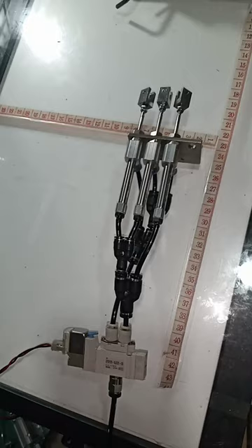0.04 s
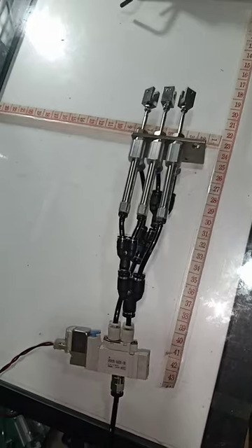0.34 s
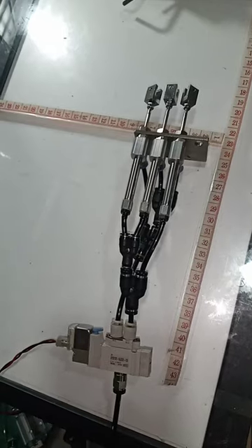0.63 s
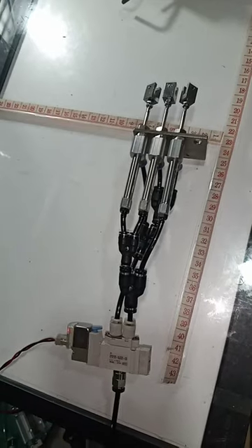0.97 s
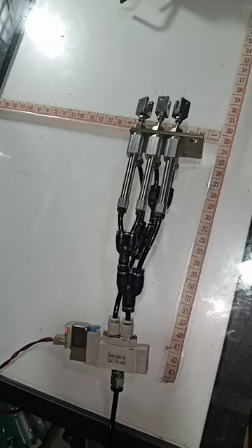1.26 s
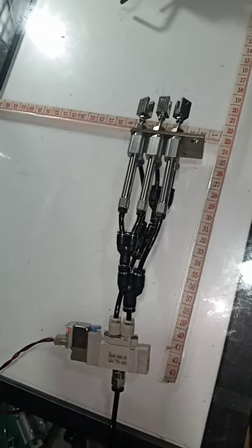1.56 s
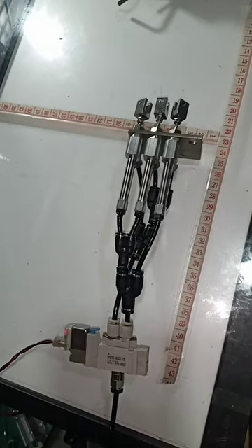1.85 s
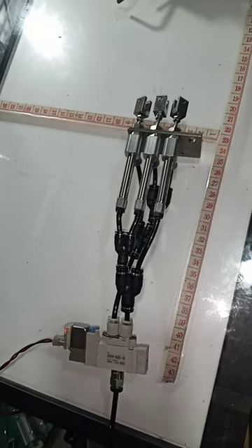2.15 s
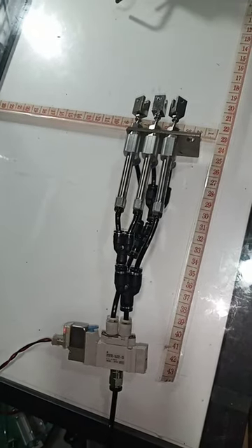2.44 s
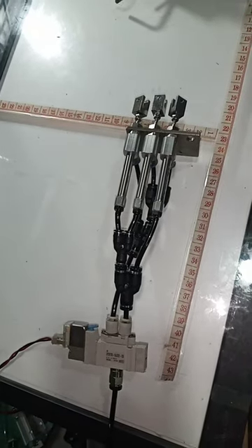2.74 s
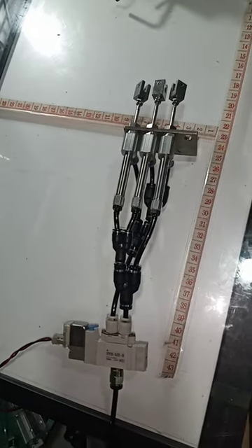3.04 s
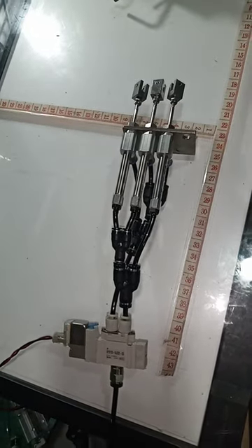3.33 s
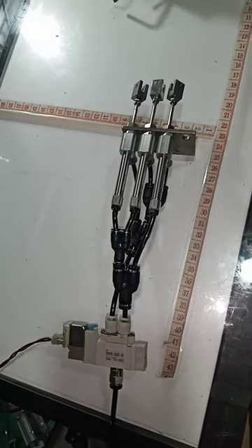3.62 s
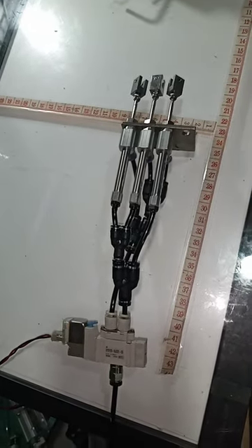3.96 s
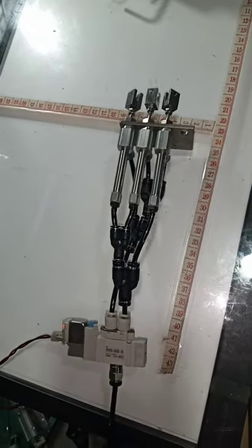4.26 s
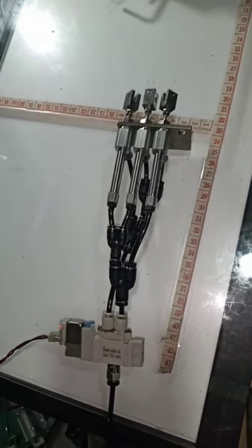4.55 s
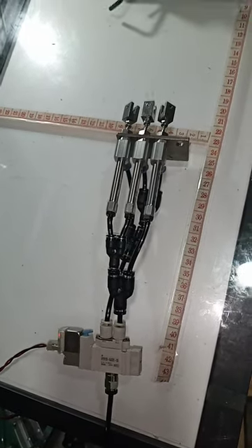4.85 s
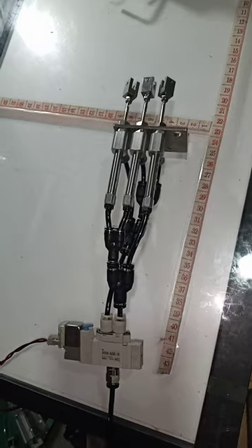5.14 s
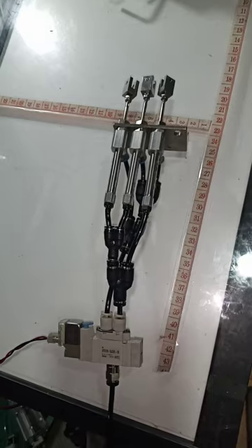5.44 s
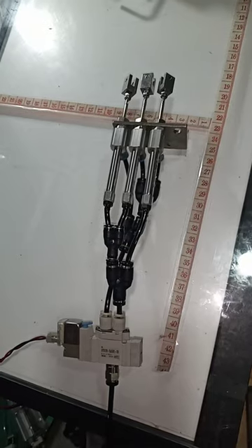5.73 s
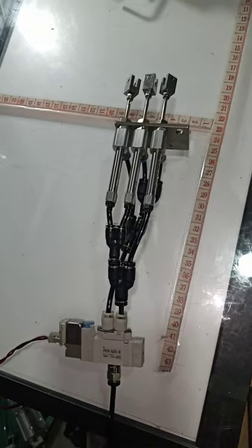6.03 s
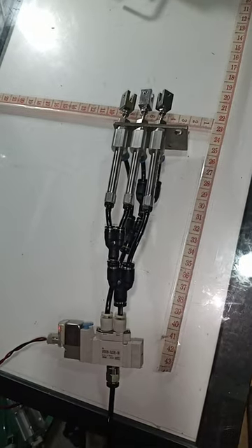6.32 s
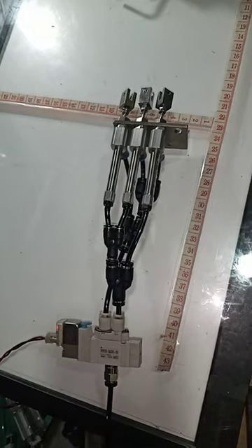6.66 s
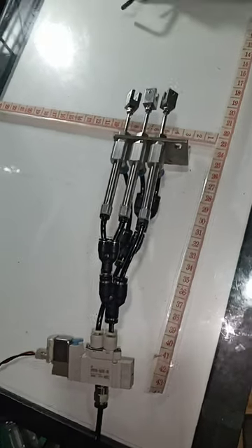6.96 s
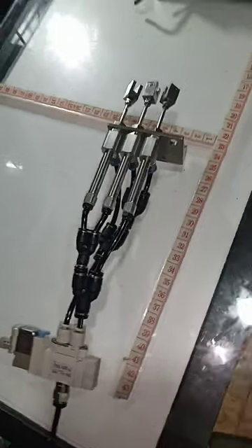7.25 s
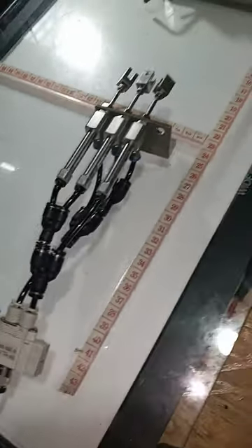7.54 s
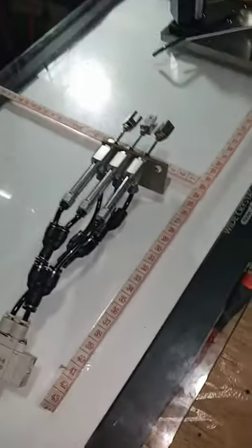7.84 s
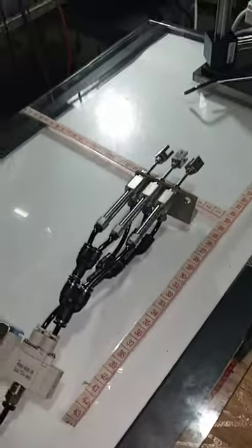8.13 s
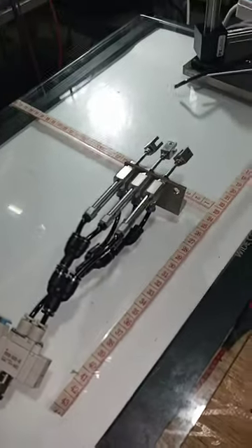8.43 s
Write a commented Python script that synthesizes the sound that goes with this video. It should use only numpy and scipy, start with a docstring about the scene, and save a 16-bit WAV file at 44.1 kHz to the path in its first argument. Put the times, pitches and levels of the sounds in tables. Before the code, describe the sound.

Small air cylinders clack sharply six times, each with a short hiss of released air, over a humming, hissing workshop with swishing machinery.

```python
"""Air cylinders on a workshop bench

A solenoid valve drives three small air cylinders through six strokes. At each, the valve clacks and
thumps the bench, the pistons knock on their stops, and spent air hisses from the exhaust port.
Behind them are a motor hum, a thin leak and machinery that swishes to and fro, whirrs and whistles.
A draught buffets the microphone, which turns away near the end."""
import sys
import numpy as np
from scipy import signal
from scipy.fft import rfft, irfft, next_fast_len
from scipy.io import wavfile
from scipy.ndimage import uniform_filter1d

SR = 44100
rng = np.random.default_rng(int(sys.argv[2]) if len(sys.argv) > 2 else 0)


def file_out(sig):
    """Save sig as 16-bit WAV at sys.argv[1]."""
    # one column per channel
    cols = np.atleast_2d(sig).T
    # limit, then scale
    lim = np.clip(cols, -1, 1)
    pcm = np.round(lim * 32767).astype(np.int16)
    wavfile.write(sys.argv[1], SR, pcm)


N = 383229
TIME = np.arange(N) / SR

# valve strokes: (time [s], clack level [dB], clack length [s], exhaust level [dB], exhaust hold [s],
# clack left-right [dB], thud level [dB], chirp level [dB])
STROKES = [(0.789, 4, 0.0024, -29.5, 0.085, 3.5, -8.5, -45), (2.53, -1, 0.0044, -30.5, .13, 3, -7.5, -35),
           (4.001, -3, 0.0024, -31.5, 0.11, 12, -22, -45),
           (4.795, -3, 0.0054, -29.5, .13, 10.5, -13.5, -10.5),
           (6.036, -5.5, 0.0024, -31, 0.12, 7, -20, -51), (6.555, -4.5, 0.0037, -29.5, .13, 9, -11, -4.5)]
# spells of whirring, each with a rush of air: (time [s], length [s], whirr level [dB], rush level [dB])
WHIRRS = [(0.58, 0.183, -48, -39.5), (2.023, .14, -48, -42), (2.59, .17, -49, -40),
          (3.297, .24, -47, -41.5), (3.79, .18, -58, -40), (4.716, 0.45, -48.5, -46),
          (5.851, 0.15, -43.5, -44.5), (6.103, .22, -48.5, -45), (7.054, 0.37, -42.5, -45),
          (7.456, 0.24, -51.5, -41.5), (8.463, 0.26, -45, -43)]


def amp(db):
    """Amplitude ratio of a level in decibels."""
    return 10 ** (np.asarray(db) / 20)


def unit_rms(x):
    """Normalisation to unit mean power."""
    return x / np.sqrt(np.mean(x ** 2) + 1e-20)


def follow(rows, t=TIME):
    """Linear interpolation of each column of a curve at the times t."""
    times, *columns = np.transpose(rows)
    return [np.interp(t, times, column) for column in columns]


def pan(balance_db):
    """Level difference, left minus right, as two gains; the louder side has gain 1."""
    balance = np.atleast_1d(balance_db)
    return amp(np.array([np.minimum(balance, 0), np.minimum(-balance, 0)]))


def colour(rows, hz):
    """Magnitude response of both channels, rolling off below the first frequency."""
    freqs, *levels = np.transpose(rows)
    gain = amp([np.interp(np.log(hz + 1), np.log(freqs), db) for db in levels])
    return gain / np.sqrt(1 + (0.84 * freqs[0] / (hz + 1)) ** 6)


def resonances(rows, hz):
    """Magnitude response of steep-sided resonances whose powers add."""
    return np.sqrt(sum((pan(balance) * amp(db) / (1 + ((hz - centre) / width * 2) ** 2)) ** 2
                       for centre, width, db, balance in rows))


def add(mix, start, sound):
    """Superposition of a stereo sound on the mix from a start time in seconds."""
    part = mix[:, max(round(start * SR), 0):][:, :sound.shape[1]]
    part += sound[:, :part.shape[1]]


def spell(start, length, rise, fall, t=TIME):
    """Envelope with a linear attack, a hold and an exponential decay."""
    age = t - start
    return np.clip(age / rise, 0, 1) * np.exp(-np.clip((age - length) / fall, 0, 20))


def drift(knots):
    """Slow random modulation: straight lines between Gaussian values."""
    return np.interp(TIME, np.linspace(0, N / SR, knots), rng.standard_normal(knots))


def white(count, correlation):
    """White noise, partly correlated between the channels."""
    left, other = rng.standard_normal((2, count))
    return np.array([left, correlation * left + np.sqrt(1 - correlation ** 2) * other])


def turbulence(response, rows, correlation, patchy_db):
    """Spectrally shaped noise whose level fluctuates in patches of time and frequency."""
    hz, _, spectra = signal.stft(white(N, correlation), SR, nperseg=2048, noverlap=1536)
    patches = uniform_filter1d(rng.standard_normal(spectra.shape[1:]), size=14, axis=0)
    patches = unit_rms(uniform_filter1d(patches, size=6, axis=1))
    spectra = spectra * response(rows, hz)[:, :, None] * amp(patchy_db * patches)
    return unit_rms(signal.istft(spectra, SR, nperseg=2048, noverlap=1536)[1][:, :N])


def through_body(force, rows):
    """Forced response of a body: a minimum-phase filter of given spectrum and unit mean energy."""
    hz = abs(np.fft.fftfreq(4096, 1 / SR))
    log_gain = np.log(colour(rows, hz) + 1e-4)
    response = np.fft.ifft(np.exp(np.conj(signal.hilbert(log_gain)))).real[:, :2048]
    return signal.oaconvolve(force, response / np.sqrt((response ** 2).sum() / 2), axes=1)[:, :N]


def free_vibration(modes):
    """Impulse response of a struck body: a sum of damped sinusoids."""
    t = np.arange(SR // 6) / SR
    return sum(amp(db - 60 * t / t60) * np.sin(2 * np.pi * hz * t) for hz, db, t60 in modes)


def workshop(floor_db=-44, waver_rad=0.52):
    """Ambient noise: a broadband wash, low room resonances and the phase-modulated hum of motors."""
    # spectrum of the wash: (frequency [Hz], left level [dB], right level [dB])
    wash = [(25, -30, -59), (82, -9, -21), (200, -24, -22), (450, -30, -32), (1340, -19.5, -29.5),
            (2040, -10.5, -38), (3000, -13.5, -32), (3940, -32.5, -31), (6000, -28.5, -37.5),
            (8640, -30, -61), (11460, -64, -37.5), (13000, -51, -64), (14800, -47, -42), (15800, -43, -60)]
    # low resonances: (frequency [Hz], width [Hz], level [dB], left-right [dB])
    rumble = [(86, 12, 3.5, 24), (134, 15, -5, 18), (178.7, 13, -2.5, 18)]
    drone = [(327, 125, 0.5, 9)]
    upper_drone = [(727, 176, -2.5, 9), (930, 150, -8.5, 15)]
    # their levels as the microphone moves: (time [s], rumble [dB], drone [dB], upper drone [dB])
    levels = [(.4, -52, -54, -58), (2.8, -49, -56, -61.5), (4.2, -52.5, -62, -59.5), (6.8, -49, -67, -57),
              (7.2, -42.5, -59, -61), (7.6, -45, -56.5, -53), (8.69, -47.5, -58, -52)]
    # motor tones: (frequency [Hz], level [dB], left-right [dB])
    hum = [(49.7, -44.5, 14), (86.5, -55, 14)]
    rumble_db, drone_db, upper_db = follow(levels)
    out = amp(floor_db) * turbulence(colour, wash, 0.023, 2.6)
    out += amp(rumble_db) * turbulence(resonances, rumble, 0.12, 1.4)
    out += amp(drone_db) * turbulence(resonances, drone, 0.019, 3)
    out += amp(upper_db) * turbulence(resonances, upper_drone, 0.092, 3)
    for hz, db, balance in hum:
        phase = 2 * np.pi * hz * TIME + waver_rad * drift(knots=40)
        out += np.sqrt(2) * amp(db) * pan(balance) * np.sin(phase)
    return out


def leak():
    """Directivity: air escaping at a fitting hisses in narrow resonances, each beamed its own way."""
    # main beam, side lobe and finer jet: (frequency [Hz], width [Hz], level [dB], left-right [dB])
    main = [(4732, 150, -1.5, 9), (5048, 303, 5, 12), (5467, 120, 1.5, 30), (6397, 147, 0, 43),
            (7045, 116, -3, 62), (7660, 140, -5.5, 22), (8220, 103, -2, 21), (9410, 190, -15, 11),
            (10400, 400, -31, -16), (11080, 240, -25, -11)]
    lobe = [(5420, 280, -5, 10), (6730, 170, -10, 20)]
    jet = [(8166, 240, 0.5, 26), (8550, 250, -7.5, 20), (10330, 250, -15.5, -12)]
    # the microphone leaves the beam, crosses the lobe and meets the jet: (time [s], level [dB])
    main_level = [(.4, -45), (4, -45), (6.7, -44.5), (7.1, -53), (7.85, -55.5), (8.69, -57.5)]
    lobe_level = [(6.6, -57), (6.95, -48.5), (7.15, -54), (7.65, -53.5), (7.85, -69)]
    jet_level = [(.4, -86), (6.6, -72), (7.1, -56), (8, -55), (8.69, -55.5)]
    beams = [(main_level, main), (lobe_level, lobe), (jet_level, jet)]
    return sum(amp(follow(level)[0]) * turbulence(resonances, rows, 0.57, 0.73) for level, rows in beams)


def swish_powers(rise_s=0.072, fall_s=0.04, swell_db=5.5, swell_s=0.24):
    """Incoherent addition: pushes and weaker returns sum as powers in three parts of the swish."""
    # machine cycles: (time [s], push length [s], push level [dB], return level [dB])
    cycles = [(0.375, .19, -37, -60), (0.808, 0.27, -32.5, -41), (1.483, 0.29, -32.5, -41.5),
              (2.205, 0.28, -32.5, -39.5), (2.896, 0.28, -33, -41), (3.6, 0.27, -33, -40),
              (4.318, 0.31, -33, -48.5), (4.858, 0.23, -38, -73), (5.42, 0.25, -39, -65),
              (6.10, 0.21, -41.5, -63), (6.65, 0.26, -38, -48.5), (7.4, 0.25, -40, -50)]
    upper, low, late = np.zeros((3, N))
    for start, length, push_db, return_db in cycles:
        push = amp(push_db) * spell(start, length, rise_s, fall_s)
        back = amp(return_db) * spell(start + length, 0.36, rise_s, fall_s)
        swell = amp(swell_db * (np.clip((TIME - start) / swell_s, 0, 1) - 1))
        upper += (push * swell) ** 2 + back ** 2
        # the low band does not swell, and its return stops earlier
        low += (amp(push_db - 1.5) * spell(start, length, 0.043, fall_s)) ** 2
        low += (amp(return_db + 1) * spell(start + length, 0.26, rise_s, fall_s)) ** 2
        late += (push * swell ** 2) ** 2
    return upper, low, late


def swish(upper_power, low_power, late_power, gain_db=2, idle_db=-62, ring_db=-9, split_hz=1600):
    """Amplitude-modulated noise in two bands, with a resonance that comes up late in each push."""
    # spectrum of the swish: (frequency [Hz], left level [dB], right level [dB])
    spectrum = [(890, -77, -47), (1198, -5, -10.5), (1200, -5.5, -12), (1970, -1.5, -16.5),
                (2380, -5, -14.5), (2980, -1, -7), (3446, -16.5, -14), (4060, -63, -50), (6000, -35, -60),
                (15700, -82, -62)]
    # late resonance: (frequency [Hz], width [Hz], level [dB], left-right [dB])
    ring = [(2883, 220, 0, 30)]
    # leftward shift as the microphone turns: (time [s], relative left-right [dB])
    side = [(.4, 12.5), (4.6, 13.5), (5.4, 15.5), (6.3, 16), (7.1, 19.5), (8.69, 20)]
    rush_power = sum((amp(db) * spell(start, length, rise=0.021, fall=0.019)) ** 2
                     for start, length, _, db in WHIRRS)
    noise = turbulence(colour, spectrum, 0.52, 1.95)
    low = signal.sosfiltfilt(signal.butter(4, split_hz, fs=SR, output="sos"), noise)
    out = np.sqrt(upper_power + rush_power + amp(idle_db) ** 2) * (noise - low)
    out += np.sqrt(low_power) * low
    out += amp(ring_db) * np.sqrt(late_power) * turbulence(resonances, ring, 0.7, 1.5)
    return amp(gain_db) * pan(follow(side)[0] - 10) * out


def whirr(swish_power, gain_db=1, idle_db=-53.5, coupling_db=-15):
    """Narrow-band noise that idles, rises in spells and is stirred a little by every swish."""
    # machine resonances: (frequency [Hz], width [Hz], level [dB], left-right [dB])
    bands = [(3370, 176, -1, 5.5), (3585, 55, 1, 10), (3684, 66, 1, 7), (3807, 180, -4.5, 16)]
    power = swish_power * amp(coupling_db) ** 2 + amp(idle_db) ** 2
    for start, length, db, _ in WHIRRS:
        power += (amp(db) * spell(start, length, rise=0.021, fall=0.019)) ** 2
    return amp(gain_db) * np.sqrt(power) * turbulence(resonances, bands, 0.1, 2.3)


def valve(decay_s=0.0025, slam_s=0.0005, tail_s=0.025, tail_db=-25, full_strike_s=0.0036, chatter=0.61):
    """Impact excitation: the spool slams over and chatters briefly as the air breaks through."""
    # response of the valve body: (frequency [Hz], left level [dB], right level [dB])
    body = [(171, 3, -11.5), (740, -1, 8), (1700, 0.5, 3), (2740, 3, -8.5), (3480, -3, -6), (5270, -2, -17),
            (6900, -1.5, -4), (7850, -12, -6.5), (7800, 6, -70), (8960, -0.5, 0), (11100, 1.5, 7.5),
            (12300, -7.5, -9), (15300, -1, 6), (17200, -45, -26)]
    force, t = np.zeros((2, N)), np.arange(3500) / SR
    for start, db, length, _, _, balance, *_ in STROKES:
        slam = 1 + 2.05 * np.exp(-t / slam_s)
        tail = amp(tail_db) * np.exp(-t / tail_s)
        envelope = slam * np.exp(-np.maximum(t - length, 0) / decay_s) + tail
        grains = unit_rms(white(len(t), 1.0) * np.exp(chatter * rng.standard_normal(len(t))))
        grains[:, 0] += 3.1 * min(length / full_strike_s, 1)  # first contact, lighter in a short clack
        add(force, start, amp(db) * pan(balance) * envelope * grains)
    return through_body(force, body)


def thuds(balance_db=7):
    """Reaction force: the recoil of the valve body excites the low modes of the bench top."""
    # bench modes: (frequency [Hz], level [dB], t60 [s])
    modes = [(110, -3, 0.14), (205, -28, .05), (260.4, -9.5, 0.098), (309, 15, 0.046), (842, 12, 0.059)]
    out, thud = np.zeros((2, N)), free_vibration(modes)
    for start, *_, db, _ in STROKES:
        add(out, start, amp(db) * pan(balance_db) * thud / abs(thud).max())
    return out


def exhaust(rise_s=0.004, bright_decay_s=0.058, dull_decay_s=0.074, split_hz=4200, flutter=0.041):
    """Jet noise: the flow holds while the chambers are full, then dies away, treble first."""
    # spectrum of the jet: (frequency [Hz], left level [dB], right level [dB])
    spectrum = [(90, -6, -9), (194, -4, -11), (710, -11, -17), (2200, 1.5, -15), (3470, -8.5, -17),
                (4400, -13, -15.5), (5800, -11, -19.5), (7400, -3, -18), (8340, -6.5, -41),
                (9400, -12, -14.5), (11100, -22, -8.5), (13900, -28, -22), (15000, -6, -10),
                (15700, -29, -27)]
    jet = turbulence(colour, spectrum, 0.24, 2.7)
    low = signal.sosfiltfilt(signal.butter(2, split_hz, fs=SR, output="sos"), jet)
    out, t = np.zeros((2, N)), np.arange(SR * 3 // 5) / SR
    for start, _, _, db, hold, *_ in STROKES:
        now = round(start * SR) + np.arange(len(t))
        emptying = np.maximum(t - hold, 0)
        ripple = unit_rms(uniform_filter1d(rng.standard_normal(len(t)), size=300))
        flow = amp(db) * (1 - np.exp(-t / rise_s)) * (1 + flutter * ripple)
        bright = (jet[:, now] - low[:, now]) * np.exp(-(emptying / bright_decay_s) ** 1.14)
        dull = low[:, now] * np.exp(-emptying / dull_decay_s)
        add(out, start, flow * (bright + dull))
    return out


def chirps(end_hz=130, sweep_hz=3300, fall_s=0.001808, delay_s=0.002745):
    """Frequency sweep: as the port opens, a short chirp drops from a whistle to a low push."""
    out, t = np.zeros((2, N)), np.arange(400) / SR
    phase = 2 * np.pi * np.cumsum(end_hz + sweep_hz * np.exp(-(t / fall_s) ** 2)) / SR
    chirp = np.sin(phase) * signal.windows.tukey(len(t), 0.15) * np.exp(-t / 0.012)
    for start, *_, db in STROKES:
        add(out, start + delay_s, amp(db) * pan(29) * chirp)
    return out


def pistons(tick_db=3, bracket_db=1.5, balance_db=8, contact_s=0.00021):
    """Impact and modal ringing: each rod ticks on its stop and excites the bracket and clevises."""
    # pistons and plunger landing: (time [s], level [dB], decay time [s], relative tick level [dB])
    knocks = [(0.8185, -7, 0.0041, -7.5), (2.5243, -26, 0.0013, 9), (2.5448, -6, 0.0044, -0.5),
              (2.5544, -7, 0.0056, -8), (4.0298, -11, 0.0044, -8.5), (4.7893, -27, 0.0011, 4),
              (4.8098, -12.5, 0.0038, 3), (4.8170, -14, .003, -3), (4.8210, -9, 0.0028, -10),
              (6.0640, -13, 0.005, -7.5), (6.0790, -34, .004, -6), (6.5495, -30, 0.0011, 6),
              (6.5693, -16, 0.0024, 8.5), (6.5760, -12.5, 0.006, -3.5), (6.5808, -12, 0.0023, -16)]
    # response of the stops: (frequency [Hz], left level [dB], right level [dB])
    stops = [(173, -35, -47), (756, -2, -25), (1100, -30, -7), (1490, 3, -47), (2010, -9.5, -42),
             (2070, 3.5, -30), (3000, 0.5, -15), (5400, -9.5, -4), (6840, -1.5, -4), (8600, -8, -14),
             (11000, -15, -8), (13500, -29, -15), (15200, -1, -11), (15800, -29, -25)]
    # modes of bracket and clevises: (frequency [Hz], level [dB], t60 [s])
    modes = [(734, -14.5, 0.06), (1600, -30, 0.037), (1780, -4, 0.013), (2076, 1.5, 0.036),
             (2373, 9, 0.012), (2536, -2, 0.043)]
    force, tick = np.zeros((2, 2, N))
    t = np.arange(2600) / SR
    for start, db, decay, hard_db in knocks:
        blow = amp(db) * (1 - np.exp(-t / contact_s)) * np.exp(-t / decay) * white(len(t), 0.15)
        add(force, start, blow)
        add(tick, start, amp(hard_db) * blow)
    bracket = free_vibration(modes)
    ringing = signal.oaconvolve(force, bracket[None] / np.linalg.norm(bracket), axes=1)[:, :N]
    return amp(tick_db) * through_body(tick, stops) + amp(bracket_db) * pan(balance_db) * ringing


def draught(low_hz=56, eddy_hz=112, eddy_db=-43, gust_db=5, puff_hz=137.4, hz_per_db=3.5):
    """Turbulent pressure on the microphone: many weak eddies and a few strong puffs make soft thuds."""
    # strong puffs: (time [s], peak level [dB], half length [s], left-right [dB])
    puffs = [(1.459, -22.5, 0.012, 1), (1.52, -22.5, 0.012, -8.5), (1.565, -27.5, 0.0075, 23),
             (1.863, -24, 0.052, 6.5), (2.07, -20.5, 0.0087, 34), (2.132, -11.5, 0.01, 38),
             (2.317, -20, 0.024, 37), (2.37, -28, 0.027, 4), (3.007, -19, 0.019, 28),
             (3.071, -10.5, 0.019, 32), (3.241, -7, 0.0028, 45), (3.438, -15, 0.016, 18),
             (3.472, -16.5, 0.015, 21), (3.747, -21.5, 0.0086, 36)]

    def low_band(x, edge_hz):
        band = [low_hz, max(edge_hz, low_hz + 20)]
        return signal.sosfilt(signal.butter(3, band, "band", fs=SR, output="sos"), x)

    gusts = amp(gust_db * drift(knots=130))
    eddies = unit_rms(gusts * low_band(white(N, 0.17), eddy_hz))
    out = amp(eddy_db) * pan(4) * spell(start=1.17, length=2.4, rise=0.054, fall=0.065) * eddies
    t = np.arange(-6000, 6000) / SR
    for centre, db, half_length, balance in puffs:
        burst = white(len(t), 0.22) * np.exp(-abs(t / half_length) ** 1.5)
        puff = low_band(burst, puff_hz + hz_per_db * (db + 20.5))  # stronger puffs reach higher
        add(out, centre + t[0] - 0.007, amp(db) * pan(balance) * puff / abs(puff).max(1, keepdims=True))
    return out


def whistles(width_hz=66, balance_db=10):
    """Random modulation of a tone: air sings briefly in a narrow, fuzzy line within the whirr's band."""
    # brief whistles: (time [s], length [s], pitch [Hz], level [dB])
    notes = [(2.007, .06, 3570, -42), (2.039, 0.14, 3710, -44.5), (3.15, 0.07, 3600, -48),
             (3.778, 0.075, 3540, -40), (3.875, 0.081, 3660, -45), (6.107, .08, 3555, -41),
             (6.222, .09, 3700, -42), (6.446, 0.051, 3660, -54), (7.439, .19, 3700, -48),
             (8.357, .1, 3740, -41.5)]
    out, t = np.zeros((2, N)), np.arange(SR // 2) / SR
    narrow = signal.butter(2, width_hz / 2, fs=SR, output="sos")
    for start, length, hz, db in notes:
        waver = signal.sosfilt(narrow, rng.standard_normal(len(t)) + 1j * rng.standard_normal(len(t)))
        tone = (waver / np.sqrt(abs(waver) + 1e-12) * np.exp(2j * np.pi * hz * t)).real
        envelope = spell(0, length, rise=0.021, fall=0.019, t=t)
        add(out, start, amp(db) * pan(balance_db) * envelope * unit_rms(tone))
    return out


def interference(x, patch_s=0.13, patch_hz=190):
    """Interference: the moving microphone passes through peaks and nulls of the room's reflections."""
    # depth of the random colouring: (time [s], depth [dB])
    depth = [(4.5, 1), (5.3, 2), (7, 2.4), (7.9, 3.3), (8.69, 2.8)]
    hz, t, spectra = signal.stft(x, SR, nperseg=1024, noverlap=768)
    field = rng.standard_normal(spectra.shape[1:])
    field = uniform_filter1d(field, size=round(patch_hz / hz[1]), axis=0)
    field = unit_rms(uniform_filter1d(field, size=round(patch_s / t[1]), axis=1))
    bass_taper = np.minimum(hz / (2 * patch_hz), 1)[:, None]
    gain = amp(follow(depth, t)[0] * field * bass_taper)
    gain /= np.sqrt((gain ** 2).mean(0))
    return signal.istft(spectra * gain, SR, nperseg=1024, noverlap=768)[1][:, :N]


def reverberation(x, gap_s=0.006):
    """Diffuse reverberation: a noise tail in which each band decays at its own rate."""
    # reverberation times: (frequency [Hz], t60 [s])
    decay_times = [(100, 0.23), (1000, 0.066), (4000, 0.42), (9000, 0.38), (16000, 0.17)]
    hz, t, spectra = signal.stft(rng.standard_normal((2, SR // 2)), SR, nperseg=256)
    t60 = np.interp(hz, *np.transpose(decay_times))
    tail = signal.istft(spectra * amp(-60 * t / t60[:, None]) * (t > gap_s), SR, nperseg=256)[1]
    return signal.fftconvolve(x, tail / np.linalg.norm(tail[0]), axes=1)[:, :N]


def standing_waves(x, dip_db=-2.0):
    """Standing waves between bench, rig and microphone lift narrow bands and thin those between."""
    # resonant peaks: (frequency [Hz], width [Hz], lift above the dip [dB])
    peaks = [(1373, 35, 5), (1562, 30, 5), (1851, 35, 4), (2102, 60, 3), (2490, 40, 3), (2850, 60, 4),
             (3544, 30, 3), (6694, 35, 3), (7224, 55, 3), (7384, 35, 3), (7840, 30, 4), (8442, 55, 3),
             (11218, 65, 4), (15187, 100, 3)]
    size = next_fast_len(N + 4096)
    hz = np.fft.rfftfreq(size, 1 / SR)
    lift = 1 + sum((amp(db) - 1) / (1 + 2j * (hz - centre) / width) for centre, width, db in peaks)
    dip = amp(dip_db * np.clip(hz / 1200, 0, 1))
    return irfft(rfft(x, size) * lift * dip, size)[:, :N]


def limiter(x, threshold_db=-14, detector_fall_db_per_s=140, strength=0.64):
    """Dynamic compression: both channels duck at each loud peak and swell back."""
    power_db = 10 * np.log10(abs(uniform_filter1d((x ** 2).mean(0), size=130)) + 1e-12)
    fall_db = TIME * detector_fall_db_per_s
    held_db = np.maximum.accumulate(power_db + fall_db) - fall_db
    over_db = np.maximum(held_db - threshold_db, 0)
    return x * amp(-strength * uniform_filter1d(over_db, size=60))


def scene(room_db=-20, lag_samples=37):
    """Superposition of rig and workshop; direct sound from rig, leak and machinery arrives right first."""
    def lag_left(x):
        return np.array([np.roll(x[0], lag_samples), x[1]])

    rig = valve() + thuds() + chirps() + pistons() + exhaust()
    upper, low, late = swish_powers()
    machinery = swish(upper, low, late) + whirr(upper) + whistles()
    background = interference(lag_left(machinery) + workshop())
    direct = lag_left(rig + leak())
    return standing_waves(direct + amp(room_db) * reverberation(rig) + background) + draught()


def record(dry, open_s=0.397, fade_s=0.31, ceiling=0.86, cutoff_hz=15900):
    """Compression, a fade-in from silence, soft saturation of the peaks and a low-pass filter."""
    fade_in = np.clip(0.06 + (TIME - open_s) / fade_s, 0, 1) * (TIME > open_s)
    rounded = ceiling * np.tanh(limiter(dry) * fade_in / ceiling)
    low_pass = signal.firwin(511, cutoff_hz, window=("kaiser", 9), fs=SR)
    return signal.oaconvolve(rounded, low_pass[None], "same")


dry = scene()
out = record(dry)
file_out(out)
```